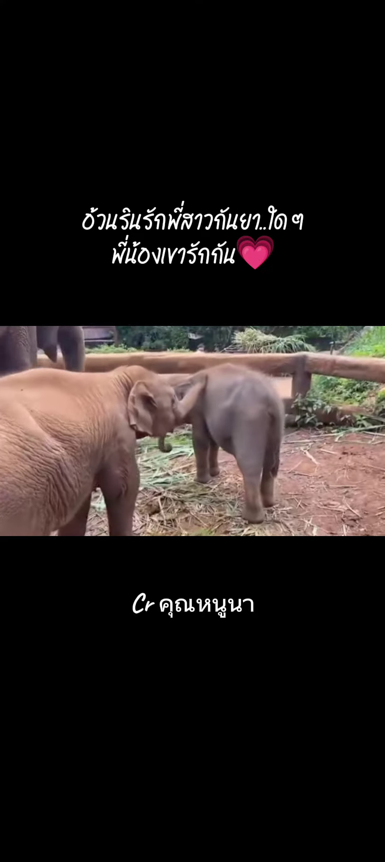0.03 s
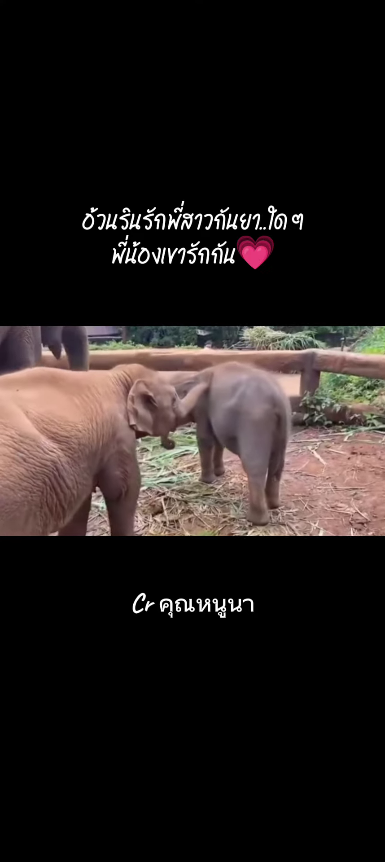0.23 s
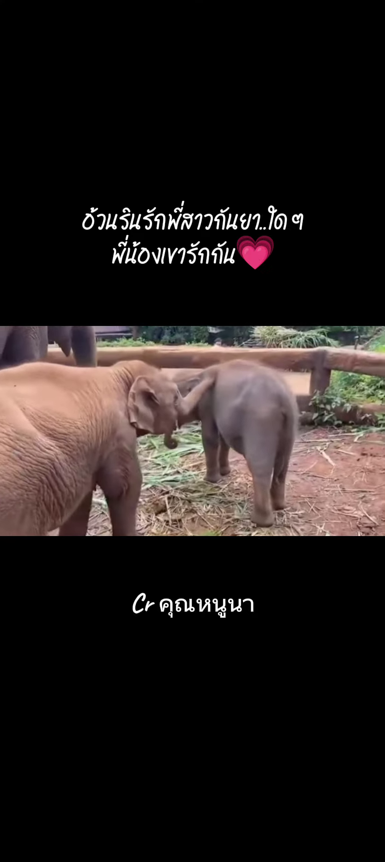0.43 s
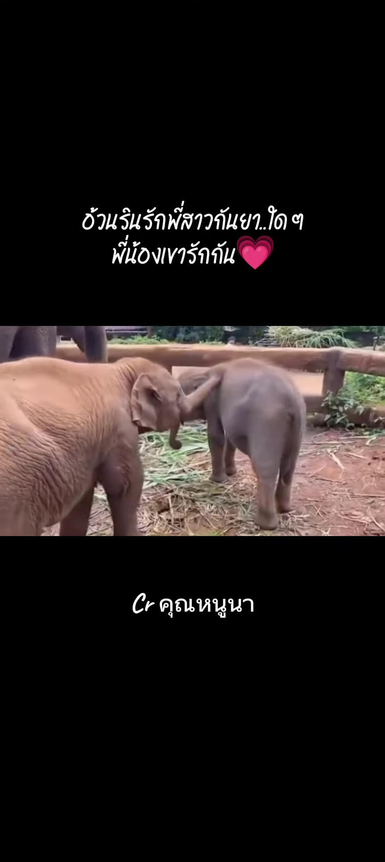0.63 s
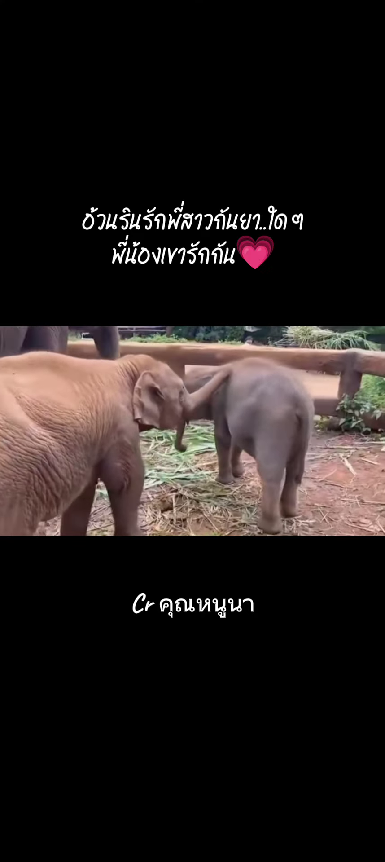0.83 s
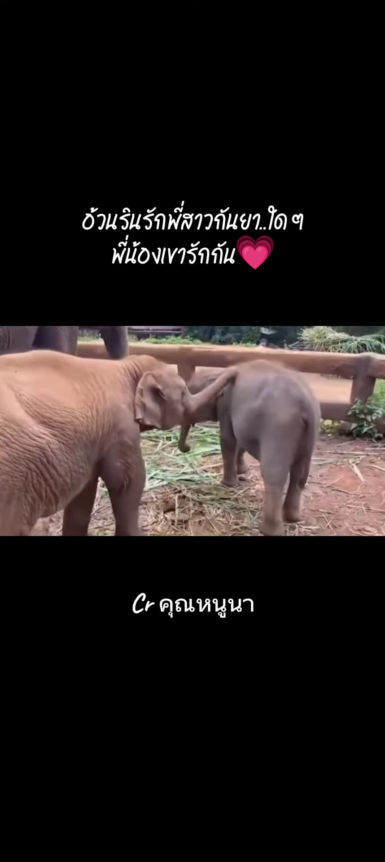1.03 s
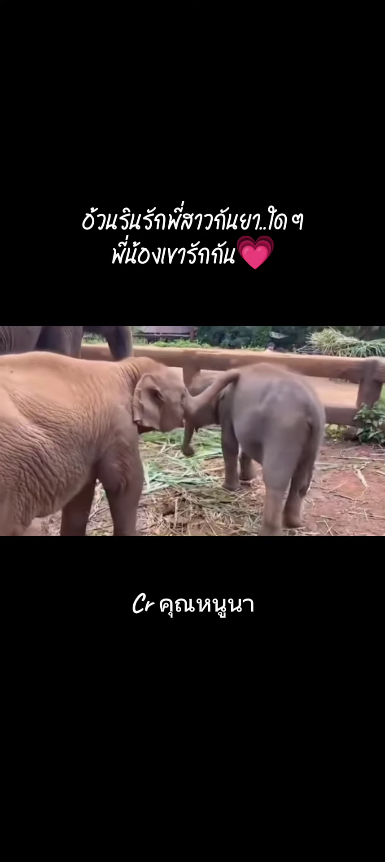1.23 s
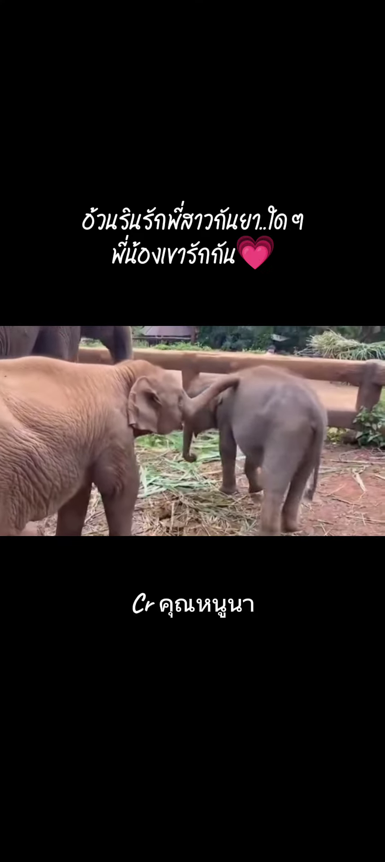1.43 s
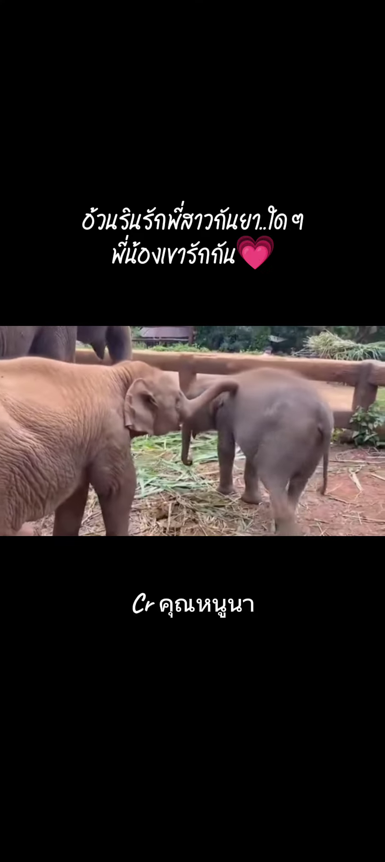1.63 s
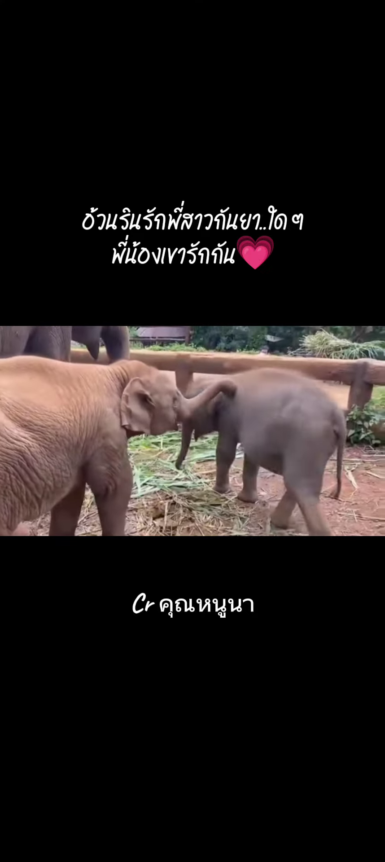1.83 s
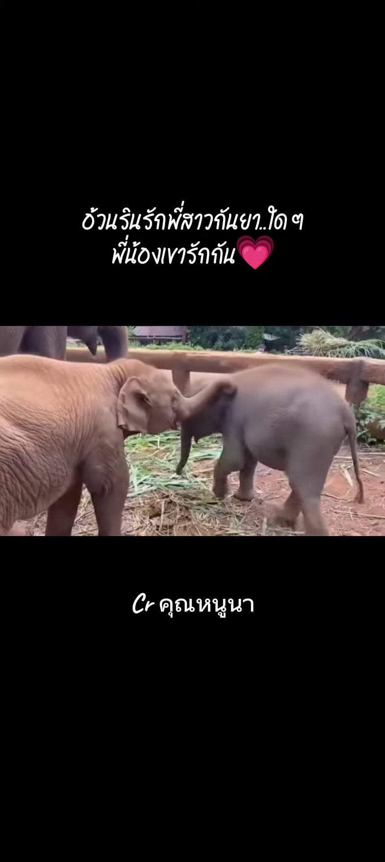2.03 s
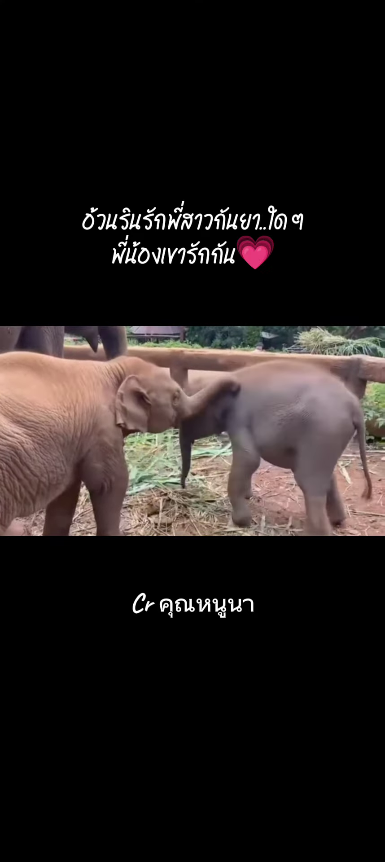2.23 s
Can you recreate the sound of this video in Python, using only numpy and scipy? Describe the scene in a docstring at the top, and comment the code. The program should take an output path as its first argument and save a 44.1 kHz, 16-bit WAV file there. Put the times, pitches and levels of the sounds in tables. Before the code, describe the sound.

Low puffs of wind buffet the microphone over the soft rustling of elephants stepping on fodder.

```python
"""Young elephants at their fodder

Young elephants shift about on dirt and cut fodder in an outdoor pen: stalks rustle and snap, feet
scuff, all from filtered noise and crackle. Puffs of wind thump on the microphone, each a short boom
that sags in pitch, over a low rumble. A thin high whine, probably an insect, hangs above the hiss of
trees, and a few faint hollow tones sound briefly."""
import sys
import numpy as np
from scipy import signal
from scipy.fft import rfft, irfft, next_fast_len
from scipy.io import wavfile
from scipy.ndimage import map_coordinates

SR = 44100
rng = np.random.default_rng(int(sys.argv[2]) if len(sys.argv) > 2 else 0)


def log_audio(samples):
    """Write samples as a 16-bit WAV file to the path given in sys.argv[1]."""
    # one column per channel
    frames = np.atleast_2d(samples).T
    # limit to full scale, then quantise
    limited = np.clip(frames, -1, 1)
    pcm = np.round(limited * 32767).astype(np.int16)
    wavfile.write(sys.argv[1], SR, pcm)


N = 105840

# EQ of the bright swish of straw blades brushing a foot: f/Hz, gain/dB
SWISH_EQ = [(3000, -30), (6000, -8.5), (8200, -4.5), (9500, -5), (11500, -17.5), (12500, -28), (15500, -35)]


def fodder():
    """Leaves and stalks rustle as the animals move, brighter when they are stirred harder."""
    # fader ride of the rustle: t/s, level/dB
    ride = [(0, -57.5), (.04, -52.5), (.15, -56.5), (.33, -56.5), (.55, -59.5), (.63, -57.5), (.75, -64),
            (.95, -62.5), (1.07, -53), (1.2, -52.5), (1.39, -51), (1.55, -54), (1.65, -53.5), (1.76, -58.5),
            (2.02, -55.5), (2.22, -51), (2.31, -60.5), (2.4, -53)]
    # body of the rustle: f/Hz, gain/dB
    body_eq = [(210, -27), (350, -4.5), (450, -7.5), (650, -8), (900, -8), (1600, -7), (2380, -4),
               (2800, -6.5), (4150, -5.5), (5200, -8), (6400, -11), (7200, -18), (8100, -20), (9800, -30),
               (11000, -42), (12600, -40), (15500, -66)]
    level_db, = curves(ride)
    level_db = level_db + 1.67 * wobble(29.74)
    body = unit(equalise(patchy(crunch()), body_eq))
    swish = unit(equalise(crunch(), SWISH_EQ))
    swish_db = -27 + 0.99 * (level_db - level_db.mean())
    return amp(level_db) * (body + amp(swish_db) * swish)


def feet():
    """Feet scuff through dirt and fodder: gritty bursts, each with its own share of straw swish."""
    # scuffs: t/s, level/dB, attack/s, T60/s, centre/Hz, swish against grit/dB
    scuffs = [(.583, -51.5, .011, 0.044, 1150, -23), (0.852, -56, 0.0066, 0.036, 2460, -26),
              (1.062, -59.5, 0.0083, 0.062, 461, -28), (1.102, -51.5, 0.016, 0.12, 1727, -13),
              (1.14, -62, 0.0064, .09, 1460, -2), (1.208, -52.5, 0.0094, 0.16, 805, -19),
              (1.446, -48.5, 0.048, 0.18, 3940, -19.5), (1.575, -56, 0.0086, 0.19, 1392, -15),
              (1.63, -57, 0.032, .25, 3000, -15), (1.805, -54.5, 0.0094, 0.26, 650, -20),
              (1.999, -56.5, 0.016, 0.25, 6070, -24), (2.059, -53, 0.022, 0.22, 4100, -24),
              (2.102, -49.5, .016, 0.18, 3600, -34), (2.11, -48.5, 0.012, 0.16, 520, -20),
              (2.112, -48, 0.034, 0.16, 2680, -16.5), (2.19, -56, 0.021, 0.42, 5610, -14)]
    # grit underfoot: f/Hz, gain/dB
    grit_eq = [(60, -28), (200, 18), (330, 8), (600, -3.5), (2000, -0.5), (4300, -7), (6300, -4),
               (7500, -13.5), (10000, -25), (12500, -27), (16000, -44)]
    skirt_db_per_octave = 6
    out = np.zeros(N)
    for start, db, attack, t60, centre, swish_db in scuffs:
        grit = coloured(crunch(), lambda f: along(grit_eq, f) - skirt_db_per_octave * octaves(f, centre))
        swish = unit(equalise(crunch(), SWISH_EQ))
        out += amp(db) * burst(start, attack, t60) * (unit(grit) + amp(swish_db) * swish)
    return out


def stalks():
    """Stalks snap, each a very short crack of noise around one pitch."""
    # snaps: t/s, level/dB, f/Hz
    snaps = [(0.474, -46, 2280), (.4992, -45, 2680), (1.103, -49, 4600), (1.123, -59, 1930),
             (1.15, -49, 1530), (1.464, -45, 4100), (1.506, -53.5, 4200), (1.5778, -58, 2170),
             (2.115, -44, 4030)]
    skirt_db_per_octave = 32.5
    out = np.zeros(N)
    for start, db, hz in snaps:
        envelope = burst(start, attack_s=0.00098, t60_s=0.035)
        crack = envelope * coloured(rng.standard_normal(N), lambda f: -skirt_db_per_octave * octaves(f, hz))
        out += amp(db) * crack * np.linalg.norm(envelope) / np.linalg.norm(crack)
    return out


def wind():
    """Puffs hit the microphone: booms swell, sag in pitch and die in a few cycles over a rumble."""
    # thumps: t/s, level/dB, starting f/Hz, swell/s
    thumps = [(0.147, -38, 70, 0.015), (0.212, -37, 133, 0.0078), (0.2368, -18.5, 104.6, 0.012),
              (0.29, -16, 166, 0.011), (0.3202, -19, 222, 0.0082), (.378, -29, 357, 0.0073),
              (.386, -20.5, 132, 0.0063), (0.404, -27.5, 192, 0.0021), (0.414, -17, 102, 0.0075),
              (0.4415, -18.5, 160, 0.011), (0.479, -30.5, 60, 0.0097), (0.506, -28, 71.4, 0.01),
              (.591, -35.5, 162, 0.0075), (0.622, -35, 80, 0.011), (.768, -42.5, 57.5, 0.021),
              (.872, -52.5, 70, 0.011), (1.319, -43.5, 71, 0.0076), (1.38, -46, 130, .011),
              (1.452, -45.5, 150, 0.01), (1.487, -44.5, 125, .011), (1.571, -36.5, 122, 0.0057),
              (1.586, -38.5, 225, 0.0055), (1.766, -42, 65, 0.016), (1.795, -39.5, 160, 0.0073),
              (1.833, -40.5, 136, 0.0082)]
    # fader ride of the rumble: t/s, level/dB
    ride = [(0, -54), (.1, -62), (.2, -47.5), (.45, -42), (.64, -62), (.72, -61), (.88, -60.5), (.96, -70),
            (1.15, -66.5), (1.29, -63), (1.35, -51), (1.55, -49), (1.69, -65), (1.8, -43.5), (1.95, -59.5),
            (2.14, -60), (2.4, -61.5)]
    # weight of the rumble: f/Hz, gain/dB
    rumble_eq = [(20, -12), (34, -6.5), (52, 2), (70, -1.5), (100, -4), (160, -17), (280, -16), (450, -53),
                 (900, -86)]
    # the microphone's response to wind, on thumps and rumble alike: f/Hz, gain/dB
    mic_eq = [(20, -7), (33, -12.5), (46, 0), (200, 0.5), (300, -2), (500, -1.5), (1000, -16)]
    rest_hz, sag_s, swell_power = 48.6, 0.013, 1.26
    level_db, = curves(ride)
    out = amp(level_db + 2.7 * wobble(18)) * unit(equalise(rng.standard_normal(N), rumble_eq))
    for start, db, hz, swell in thumps:
        t = np.maximum(clock() - start, 0)
        cycles = rest_hz * t + (hz - rest_hz) * sag_s * (1 - np.exp(-t / sag_s))
        envelope = (t / swell * np.exp(1 - t / swell)) ** swell_power
        out += amp(db) * envelope * np.sin(2 * np.pi * cycles)
    return equalise(out, mic_eq)


def hollow_tones():
    """Brief, soft tones with a little flutter and faint smeared overtones."""
    # tones: centre t/s, level/dB, f/Hz, half length/s, glide/(Hz per s)
    tones = [(1.422, -41.5, 321, .014, 0), (1.913, -39, 257, .019, 800), (1.876, -50.5, 276, .032, -300),
             (1.886, -54, 729, .017, 2000)]
    flutter_rad, overtone_db = 0.41, -22.5
    out = np.zeros(N)
    for centre, db, hz, half_length, glide in tones:
        t = clock() - centre
        phase = 2 * np.pi * (hz * t + glide * t * t / 2) + flutter_rad * wobble(160)
        overtones = sum(np.sin(k * phase) * 2 / k for k in range(2, 6))
        envelope = np.exp(-(t / half_length) ** 2)
        out += amp(db) * envelope * (np.sin(phase) + amp(overtone_db) * overtones)
    return out


def insect():
    """A thin, flickering whine, probably an insect, that wavers widely at first and then steadies."""
    # the flight: t/s, f/Hz, level/dB
    flight = [(0, 4170, -76), (.36, 4195, -71), (.64, 4195, -72), (.69, 4195, -64.5), (.75, 4225, -70),
              (.8, 4240, -66), (.825, 4245, -71), (.848, 4255, -64), (.866, 4255, -72), (.885, 4255, -65),
              (.93, 4265, -78), (1.03, 4265, -65.5), (1.16, 4260, -72), (1.26, 4260, -60.5),
              (1.33, 4250, -72), (1.72, 4241, -71), (1.77, 4241, -63.5), (1.88, 4241, -62.5),
              (1.93, 4241, -68), (2.05, 4241, -67.5), (2.25, 4242, -71), (2.4, 4242, -69)]
    waver_hz, early_waver_hz, settle_s, flicker_db = 9, 45, 0.6, 3
    hz, level_db = curves(flight)
    waver = waver_hz + early_waver_hz * np.exp(-(clock() / settle_s) ** 2)
    phase = 2 * np.pi * np.cumsum(hz + waver * wobble(140)) / SR
    return amp(level_db + flicker_db * wobble(28)) * np.sqrt(2) * np.sin(phase)


def trees():
    """A steady bed of hiss from the surrounding trees."""
    # colour of the bed: f/Hz, gain/dB
    bed_eq = [(88, -28.5), (150, -10), (274, -2), (470, -11), (830, -13), (1730, -14), (3090, -16),
              (3800, -19), (4250, -7), (4600, -25.5), (6100, -17.5), (7300, -31), (9500, -37.5),
              (11000, -62.5), (15500, -85)]
    return amp(-59.5) * unit(equalise(patchy(rng.standard_normal(N)), bed_eq))


def pen_echo(x, t60_s=0.32, wet_db=-1.5):
    """The ground and rails add a short reverb tail to x."""
    t = np.arange(SR // 2) / SR
    tail = rng.standard_normal(len(t)) * amp(-60 * t / t60_s)
    return x + amp(wet_db) * signal.fftconvolve(x, tail / np.linalg.norm(tail))[:N]


def crunch(crackles_per_s=1800, spread_db=2, crackle_db=-3.5):
    """A dense spray of tiny crackles of uneven size over smooth friction noise."""
    hits = rng.random(N) < crackles_per_s / SR
    sizes = amp(spread_db * np.minimum(rng.exponential(size=N), 5))
    friction = rng.standard_normal(N)
    crackles = unit(hits * sizes * rng.choice([-1, 1], N))
    return unit(friction + amp(crackle_db) * crackles)


def patchy(x, width_hz=129.6, length_s=0.0994, depth_db=2.5):
    """Keep the colour of x shifting with random patches of gain across frequency and time."""
    spectrum = signal.stft(x, nperseg=2048)[2]
    bins, frames = np.indices(spectrum.shape)
    position = [bins * SR / 2048 / width_hz, frames * 1024 / SR / length_s]
    patches = map_coordinates(rng.standard_normal((1024, 128)), position, mode="wrap")
    return signal.istft(spectrum * amp(depth_db * patches), nperseg=2048)[1][:N]


def burst(start, attack_s, t60_s):
    """An envelope with a linear attack and an exponential decay."""
    t = clock() - start
    return np.clip(t / attack_s, 0, 1) * amp(-60 * np.maximum(t - attack_s, 0) / t60_s)


def wobble(rate):
    """A smooth random curve, rate knots a second."""
    return map_coordinates(rng.standard_normal(2048), [clock() * rate + 2])


def curves(rows):
    """An automation curve for each column after the time."""
    times, *columns = np.transpose(rows)
    return [np.interp(clock(), times, column) for column in columns]


def coloured(x, db_of):
    """Filter x by a dB gain that is a function of frequency."""
    size = next_fast_len(N + 8192)
    return irfft(rfft(x, size) * amp(db_of(np.fft.rfftfreq(size, 1 / SR))), size)[:N]


def equalise(x, eq):
    """Filter x through an EQ table."""
    return coloured(x, lambda f: along(eq, f))


def along(eq, hz):
    """An EQ table's gain in dB at hz, interpolated on a log frequency axis."""
    f, db = np.transpose(eq)
    return np.interp(np.log(hz + 1), np.log(f + 1), db)


def octaves(hz, centre):
    """Distance from a centre frequency in octaves."""
    return np.abs(np.log2((hz + 1) / centre))


def clock():
    """Time of each sample in seconds."""
    return np.arange(N) / SR


def amp(db):
    """Decibels to gain."""
    return 10 ** (np.asarray(db) / 20)


def unit(x):
    """Scale to rms 1."""
    return x / np.sqrt(np.mean(x ** 2) + 1e-20)


def scene():
    """Mono mix of elephants, wind and background; only the feet feed the reverb."""
    pen = pen_echo(feet()) + stalks() + fodder() + trees()
    return (pen + wind() + hollow_tones() + insect())[None]


def record(dry):
    """The recorder adds a trace of hiss and cuts everything above its band limit."""
    hiss_db, top_hz = -94, 15650
    noisy = dry[0] + amp(hiss_db) * rng.standard_normal(N)
    return coloured(noisy, lambda f: -120 * (f > top_hz))[None]


dry = scene()
out = record(dry)
log_audio(out)
```